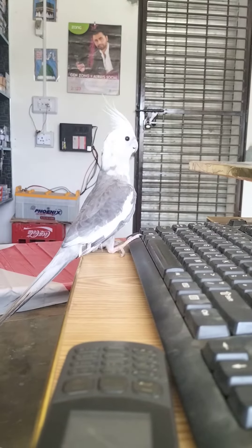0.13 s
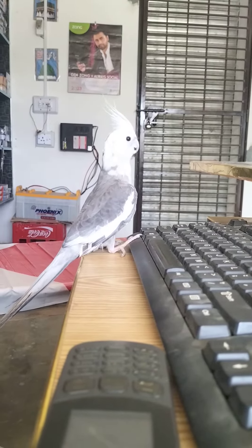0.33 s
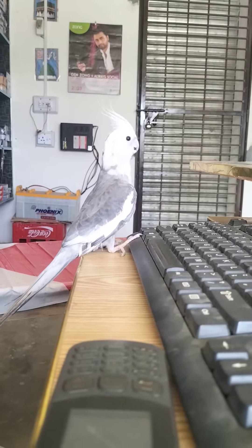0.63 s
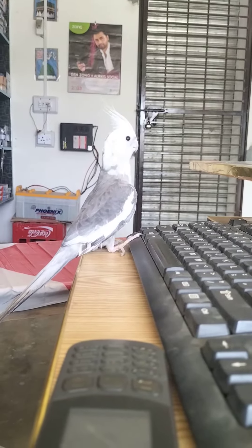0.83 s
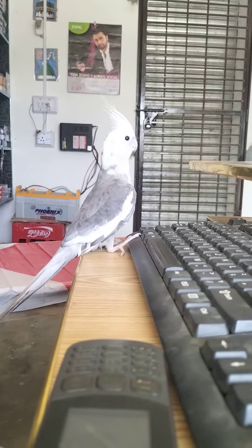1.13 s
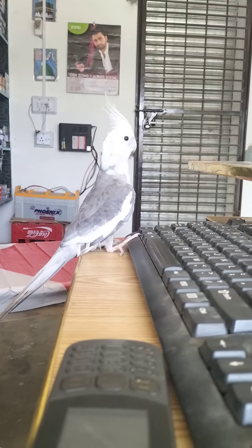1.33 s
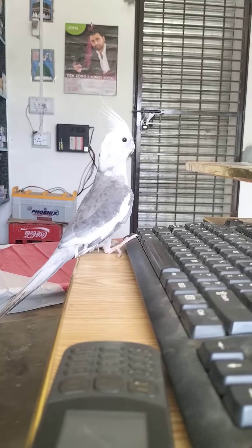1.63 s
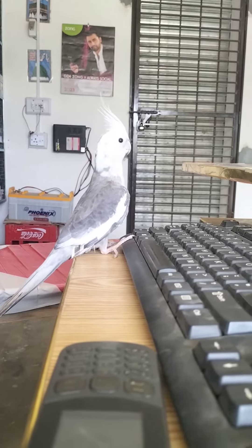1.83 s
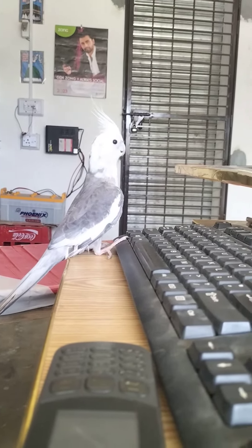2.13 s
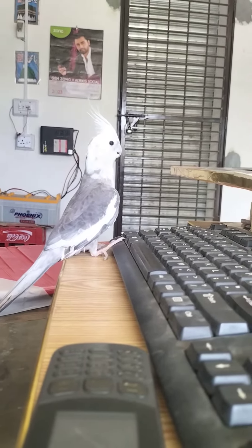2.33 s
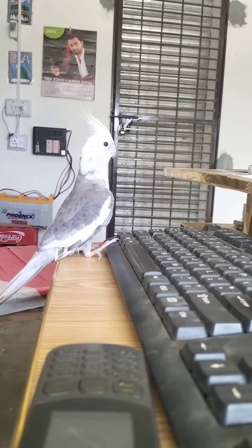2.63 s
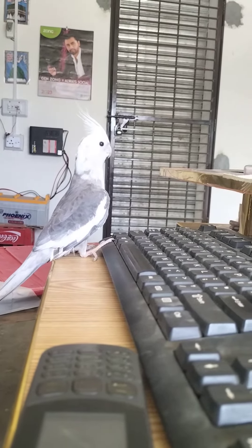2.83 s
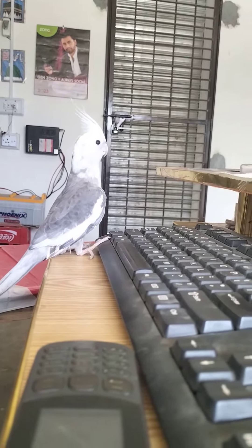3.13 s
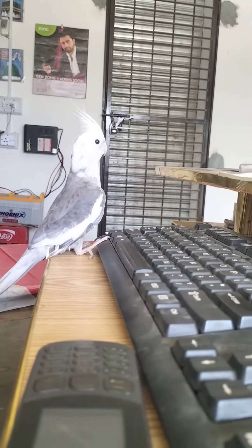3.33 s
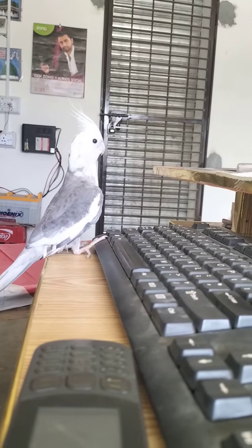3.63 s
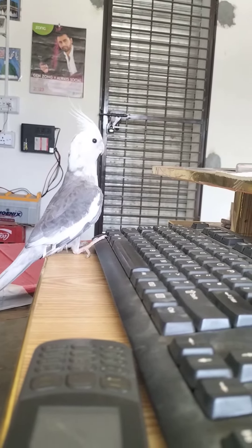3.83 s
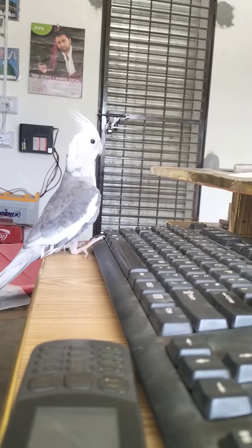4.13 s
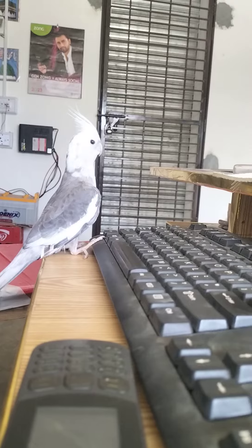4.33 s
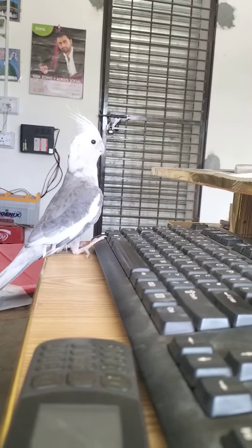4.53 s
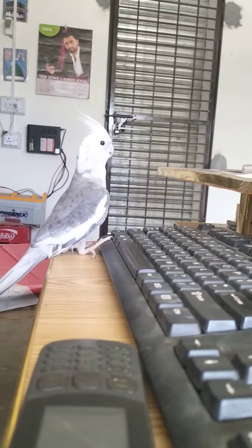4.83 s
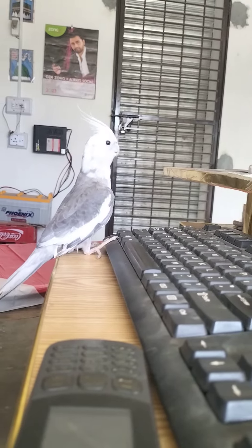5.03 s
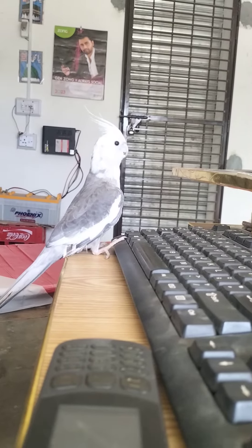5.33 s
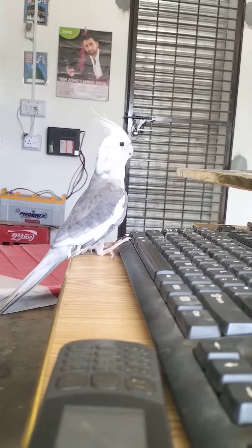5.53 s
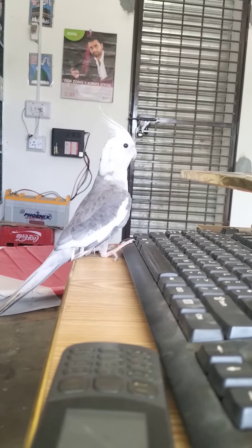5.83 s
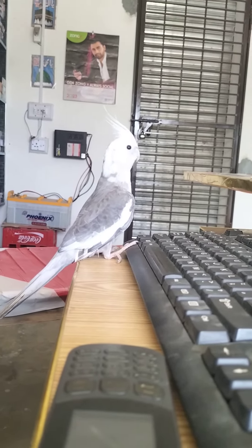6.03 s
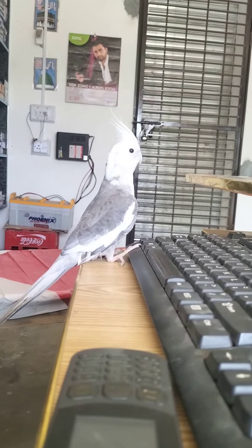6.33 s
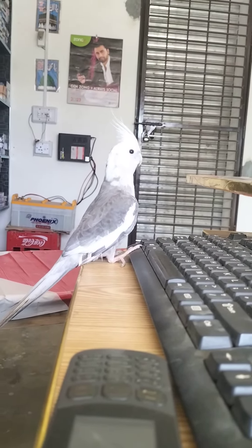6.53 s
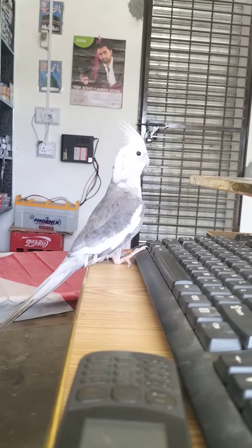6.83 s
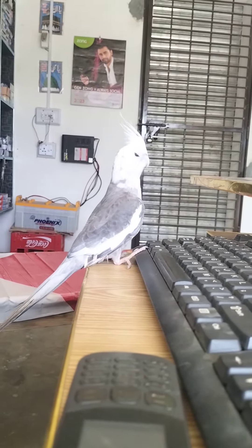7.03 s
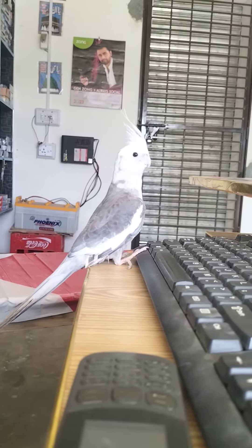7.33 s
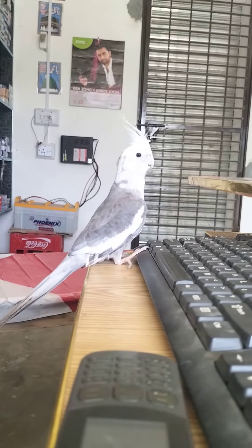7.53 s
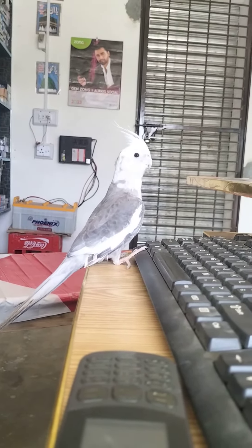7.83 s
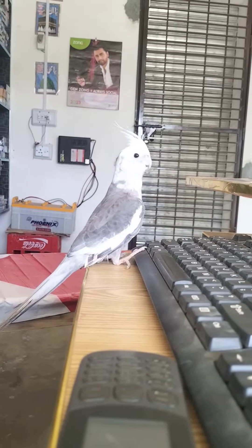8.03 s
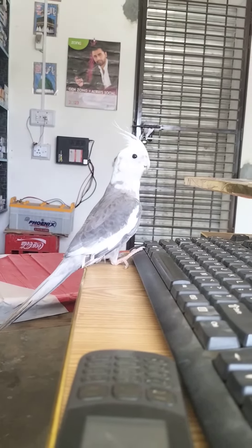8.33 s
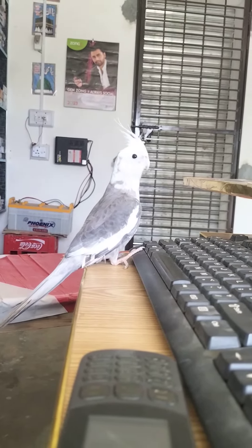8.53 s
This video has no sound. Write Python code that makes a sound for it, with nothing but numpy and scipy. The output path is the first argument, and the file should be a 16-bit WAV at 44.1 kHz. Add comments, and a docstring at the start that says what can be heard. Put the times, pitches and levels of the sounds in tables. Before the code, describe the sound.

Six sharp, nearly pure bird whistles burst out in a quiet room, separated by pauses, the last two closer together. Each jumps or climbs to a high held tone, sometimes roughening, and most drop into short lower swoops. Hard walls return a bright short ring. Far underneath are low rumble and hiss, a slow engine putter early on, a barely audible distant double caw midway, small clicks and dull thuds, all picked up by a nearby phone microphone.

```python
"""Cockatiel calling on a desk

Small, hard-walled room, phone microphone close by: a cockatiel gives six loud whistled calls.
Each opens with a reedy scoop and leap, or a hoarse climb, holds a clear tone near 3 kHz and breaks into
lower swoops: a near sine with overtones shaped by the throat, heard straight and off the walls.
Behind it: noise washes of air and traffic, sine hums and chirps, an engine's pulses, a far crow, clicks, bumps."""
import sys
import numpy as np
from scipy import signal
from scipy.fft import rfft, irfft, next_fast_len
from scipy.io import wavfile
from scipy.ndimage import uniform_filter1d, minimum_filter1d, map_coordinates

SR = 44100
rng = np.random.default_rng(int(sys.argv[2]) if len(sys.argv) > 2 else 0)


def wav_record(signal):
    """Record a signal, one row per channel, as 16-bit PCM in the file named by sys.argv[1]."""
    frames = np.transpose(np.atleast_2d(signal))
    bounded = np.clip(frames, -1, 1)
    # unit amplitude maps onto the largest positive 16-bit level
    quanta = np.round(bounded * 32767).astype(np.int16)
    wavfile.write(sys.argv[1], SR, quanta)


N = 382788  # length in samples

# Distant wash and hiss: start_s, wash_level_db, hiss_level_db
BACKGROUND_LEVELS = [(0, -58, -64.5), (1.2, -59.5, -69), (3.6, -60.5, -70.5), (4.4, -66.5, -79.5),
                     (5.6, -60, -76), (6.3, -65.5, -81), (7.1, -66, -80), (8.68, -61.5, -65)]
# Colours of the low rumble, mid air and hiss: freq_hz, relative_density_db
RUMBLE_COLOUR = [(20, -24), (45, -10.5), (75, -5), (150, 0.5), (210, -3.5), (320, 3.5), (450, -5.5),
                 (800, -39.5), (2000, -120)]
AIR_COLOUR = [(200, -28), (450, -1.5), (750, -0.5), (1300, -6.5), (2000, -17.5), (3000, -36), (6000, -120)]
HISS_COLOUR = [(100, -61.5), (1200, -19.5), (2400, 1.5), (4000, 3), (4600, -4.5), (5900, -0.5), (7000, -10),
               (8200, -30.5), (10000, -37.5), (11800, -32.5), (13000, -40), (15500, -38)]
AIR_DB = -0.9  # mid air over the low rumble
# Faint hums that come and go: pitch_hz, level_db, start_s, end_s
HUMS = [(97, -57.5, -1, .1), (158, -60.5, -1, 3.35), (73, -74.5, 0, 2.8), (71, -69, 3.5, 6.35)]
# Idling engine far outside, fading away: start_s, level_db
ENGINE_LEVELS = [(0, -59), (3, -64.5), (4.6, -77.5), (8.68, -84.5)]
# Resonances of its exhaust: freq_hz, width_hz, relative_level_db
EXHAUST_MODES = [(99, 30, -6), (154, 29, 2)]
# Resonances of the far crow's throat: freq_hz, width_hz, relative_level_db
CROW_THROAT = [(1407, 84, 1.5), (1758, 197, 2.5), (2267, 210, -11)]
# Far crow's caws: start_s, length_s, level_before_mix_db
CAWS = [(3.978, .04, -54), (4.084, .05, -54)]
CAW_FADE_S = 0.058
# Faint far tones and chirps: start_s, length_s, start_hz, end_hz, level_before_mix_db, quaver_share_of_pitch
CHIRPS = [(.023, 0.057, 254, 231, -48.5, .02), (.197, 0.099, 238, 264, -49.5, 0.023),
          (.235, .07, 750, 798, -56, .02), (.564, 0.066, 779, 750, -50, 0.021),
          (1.142, 0.087, 262, 236, -51, 0.018), (1.668, 0.099, 3850, 3790, -61.5, 0.075),
          (1.838, 0.063, 570, 589, -61.5, 0.027), (1.93, 0.0595, 2087, 2000, -68.5, .04),
          (3.188, 0.068, 1400, 1376, -62.5, .02), (7.096, 0.081, 3590, 3560, -61, 0.014),
          (7.12, 0.073, 2410, 2336, -65.5, .05), (7.329, 0.044, 3120, 3300, -56, .025),
          (8.56, 0.13, 289.5, 284, -58.5, .02)]
# Soft bumps through the desk: start_s, level_db
BUMPS = [(5.48, -55), (5.7, -53.5), (7.37, -55), (7.6, -53)]
# Tiny dry clicks, one alone and one at the onset of the fourth call: start_s, level_db
TICKS = [(3.819, -50.5), (5.377, -46.5)]

# What throat and beak pass of the overtones: freq_hz, gain_db
OVERTONE_THROAT = [(2800, -8.5), (3700, -16), (4230, -4.5), (4500, -15), (4850, -14), (5300, -21.5),
                   (6000, -18.5), (6700, -22.5), (7300, -33), (8200, -49), (9800, -56), (11000, -40),
                   (12000, -42.5), (13200, -46.5), (15500, -50.5)]
# What throat and beak pass of the fundamental: freq_hz, gain_db
FUNDAMENTAL_THROAT = [(1400, -20), (1850, -14.5), (2100, -10.5), (2400, -3), (2650, 0), (3170, -2),
                      (3350, -10.5), (3800, -10)]
# Colour of the rasp around the whistle's lines: freq_hz, relative_density_db
RASP_COLOUR = [(600, -88.5), (1300, -45), (2100, 0), (2800, -4), (3700, -2), (4500, -11), (5500, -6.5),
               (6600, -13.5), (8400, -35.5), (10000, -43.5), (11800, -33), (15500, -44.5)]
# Calls opening with a reedy scoop and a yodelling leap: start_s, scoop_length_s, scoop_lowest_hz,
# scoop_final_effort_db, leap_top_hz, leap_dip_hz, leap_effort_db, leap_roughness_0_to_1
YODELS = [(.123, .077, 1385, -14, 2620, 1919, -13, 0), (2.148, .048, 1545, -9, 2974, 2655, -9.5, 0.2),
          (4.594, .066, 1450, -14, 2900, 2513, -15, .06), (7.372, .062, 1445, -12.5, 3350, 2520, -19, 0.4)]
# Scoop: share of its length spent falling; first and last pitch over the lowest
SCOOP_FALL, SCOOP_FROM, SCOOP_TO = .43, 1.1, 1.32
SCOOP_SWELL_DB, SCOOP_BRIGHT_DB, SCOOP_ROUGH = 8.5, -13.5, .05
# Leap: the pitch it starts from after the flip; the shares of its length at which it tops and dips
LEAP_HZ, LEAP_TOP, LEAP_DIP, LEAP_BRIGHT_DB = 2498, .27, .67, -8
LEAP_ONSET_DB = -3  # the voice lands a little softly after the flip
# Calls opening with a hoarse two-step climb: start_s, effort_db
CLIMBS = [(5.385, -9.5), (8.068, -10)]
# The climb they share: length_share, pitch_over_whistle, added_effort_db, brightness_db, roughness_0_to_1
CLIMB_SHAPE = [(0, .576, -12, -9, .85), (.09, .576, -4.5, -13, 0.76), (.14, .605, 1.5, -7, .12),
               (.28, .773, 0, -3.5, .06), (.53, .759, -4.5, -2, .05), (.63, .853, 2.5, 3, .05),
               (.77, .986, -3.5, -1, 0.25), (.87, 1.16, -5.5, -12, .5), (.95, 1.12, 4.5, -14.5, .45)]
# Held whistle of each call, from the end of its opening: time_s, pitch_hz, effort_db, roughness_0_to_1
WHISTLES = [
    [(.27, 2887, -12, 0), (.32, 2830, -11, 0.1), (.342, 3063, -6.5, 0), (.4, 2994, -11.5, .07),
     (.425, 2830, -17, 0.48), (.45, 2987, -15.5, 0.5), (.49, 3246, -16.5, .35), (.511, 3030, -14.5, .3)],
    [(2.28, 2935, -8.5, .05), (2.355, 2934, -13, .05), (2.365, 3025, -11.5, .05), (2.44, 3000, -14.5, .04),
     (2.508, 2986, -9.5, .04)],
    [(4.745, 2965, -11.5, 0), (4.79, 2979, -9.5, 0.01), (4.842, 2931, -14, 0.05), (4.88, 3200, -22.5, .3),
     (4.903, 2990, -25, .8), (4.915, 3000, -18.5, .1), (4.942, 2790, -17.5, .2), (4.955, 2151, -17.5, .3),
     (4.974, 2873, -18.5, .1), (5.008, 3072, -11, .05)],
    [(5.546, 3130, -6.5, 0.14), (5.57, 3143, -7.5, .05), (5.598, 3042, -3.5, .05)],
    [(7.505, 2790, -13, .07), (7.53, 2859, -17.5, .05), (7.585, 2895, -15, .06), (7.595, 3019, -19.5, .08),
     (7.63, 2967, -22, .12), (7.67, 2904, -19.5, .1), (7.726, 2879, -20.5, 0.1)],
    [(8.254, 3160, -7.5, .04), (8.31, 3130, -13.5, .05), (8.349, 3050, -10.5, .05),
     (8.401, 2960, -14.5, .05)],
]
# The whistle gets purer as it gets louder: dB of overtones lost per dB of effort
WHISTLE_BRIGHT_DB, PURITY = -13.5, 0.67
# Lower notes a whistle breaks into: start_s, fall_s, rise_s, first_hz, turning_hz, last_hz,
# mid_effort_db, brightness_db, roughness_0_to_1
CLOSINGS = [(.517, .015, .055, 2280, 2205, 2688, -14, -6.5, .06),
            (0.596, .04, .024, 2467, 2099, 2641, -13.5, 11, 0),
            (2.512, .018, .022, 2646, 2556, 2707, -7.5, -6, .04),
            (5.034, .012, .012, 2387, 2405, 2377, -13.5, 1, 0.07),
            (5.601, .029, 0.026, 2321, 2234, 3080, -9.5, -2.5, 0.5),
            (7.732, .02, .037, 2302, 2166, 2543, -13, -10, 0),
            (8.404, .032, .002, 2680, 2291, 2164, -10, -4, .08)]
CLOSING_SWELL_DB = 4.5
BEND = 1.6  # power of time with which a swoop leaves its turning pitch
# In glides this fast the voice loses overtones and turns rough
GLIDE_OCT_PER_S, GLIDE_DULL_DB, GLIDE_ROUGH = 13, 6.5, 0.12

# The room's ring: freq_hz, t60_s
ROOM_RING = [(1500, 0.56), (3000, 0.48), (6000, .44), (12000, .35)]
# The beak points away, so the overtones reach the microphone mostly off the walls.
# Straight path and wall path: freq_hz, gain_db
DIRECT_PATH = [(1500, -3.5), (3200, 0.5), (4500, -3.5), (6000, -5.5), (12000, -3)]
REFLECTED_PATH = [(1500, -7), (3200, -7.5), (4500, -5), (6000, -0.5), (12000, -2)]
TOP_HZ = 15550  # band limit of the phone


def amp(db):
    """Amplitude factor of a level in dB."""
    return 10 ** (np.asarray(db) / 20)


def unit(x):
    """x scaled to rms 1."""
    return x / np.sqrt(np.mean(x ** 2) + 1e-20)


def along(table, hz):
    """Values of a (Hz, value) table, read on a log frequency axis."""
    f, v = np.transpose(table)
    return np.interp(np.log(hz + 1), np.log(f), v)


def curves(rows, t):
    """Each column after the time, read at the times t."""
    s, *cols = np.transpose(rows)
    return [np.interp(t, np.sort(s), c) for c in cols]


def wobble(rate, size):
    """A smooth random curve, rate knots a second."""
    knots = rng.standard_normal(int(size * rate / SR) + 4)
    return map_coordinates(knots, [np.arange(size) * rate / SR])


def filtered(x, response):
    """x times a response of frequency."""
    m = next_fast_len(N + SR // 2)
    return irfft(rfft(x, m) * response(np.fft.rfftfreq(m, 1 / SR)), m)[:N]


def noise(colour):
    """Noise of rms 1 with the given colour."""
    return unit(filtered(rng.standard_normal(N), lambda hz: amp(along(colour, hz))))


def gate(t, start, end, fade):
    """1 between start and end, with soft edges just outside."""
    inside = np.minimum(t - start, end - t)
    return np.sin(np.pi / 2 * np.clip(inside / fade + 1, 0, 1)) ** 2


def background(t):
    """Distant rumble, air and hiss: coloured noises whose levels drift slowly."""
    wash_db, hiss_db = curves(BACKGROUND_LEVELS, t)
    rumble = amp(wash_db + .8 * wobble(8.4, N)) * noise(RUMBLE_COLOUR)
    air = amp(wash_db + AIR_DB) * noise(AIR_COLOUR)
    hiss = amp(hiss_db + .7 * wobble(7, N)) * noise(HISS_COLOUR)
    return rumble + air + hiss


def hums(t):
    """Faint low sines, unsteady in level and phase."""
    out = np.zeros(N)
    for hz, db, start, end in HUMS:
        level = amp(db + 1.5 * wobble(7, N)) * gate(t, start, end, 0.65)
        out += level * np.sin(2 * np.pi * hz * t + .9 * wobble(9, N))
    return out


def exhaust(f):
    """Complex response of the exhaust's resonances, alternating in sign."""
    response = 0
    for k, (hz, width, db) in enumerate(EXHAUST_MODES):
        response = response + (-1) ** k * amp(db) * 1j * f * width / (hz * hz - f * f + 1j * f * width)
    return response


def engine(t, scatter_db=1.15):
    """Far outside, each firing of a slow single cylinder rings the exhaust."""
    firing_hz = 14.2 * (1 + .015 * wobble(3, N))
    turns = np.floor(np.cumsum(firing_hz) / SR)
    firings = np.diff(turns, prepend=0) * amp(scatter_db * wobble(33, N))
    muffled = filtered(firings, lambda f: exhaust(f) / (1 + (f / 300) ** 4))
    return amp(curves(ENGINE_LEVELS, t)[0]) * unit(muffled)


def crow(t):
    """A far crow's hoarse double caw: noise through the throat's resonances."""
    def throat(f):
        return sum(amp(db) / (1 + (2 * (f - hz) / width) ** 2) for hz, width, db in CROW_THROAT)

    caws = sum(amp(db) * gate(t, s, s + length, CAW_FADE_S) for s, length, db in CAWS)
    return caws * unit(filtered(rng.standard_normal(N), throat))


def chirps(t):
    """Faint tones from outside: short gliding sines with a quavering pitch."""
    out = np.zeros(N)
    unsteady = wobble(500, N)
    for s, length, start_hz, end_hz, db, quaver in CHIRPS:
        pitch = np.interp(t, [s, s + length], [start_hz, end_hz]) * (1 + quaver * unsteady)
        out += amp(db) * gate(t, s, s + length, .02) * np.sin(2 * np.pi * np.cumsum(pitch) / SR)
    return out


def bumps(t, desk_hz=55, t60=0.17):
    """Dull, quickly damped thuds in the desk top."""
    ages = [(np.maximum(t - s, 0), db) for s, db in BUMPS]
    return sum(amp(db - 60 * age / t60) * np.sin(2 * np.pi * desk_hz * age) for age, db in ages)


def ticks(t, t60=0.0104):
    """Tiny dry clicks, one alone and one at the onset of the fourth call: coloured noise that dies quickly."""
    strength = sum(amp(db - 60 * np.abs(t - s) / t60) * (t >= s) for s, db in TICKS)
    colour = [(1500, -21), (2700, 1.0), (4500, -8.0), (7000, -2.5), (8500, -33.0), (14000, -49.5)]
    return strength * noise(colour)


def swoop(start, fall, rise, first, turn, last, count=6):
    """Times and pitches of a rounded dip or arch: to the turning pitch and away again."""
    u = np.arange(-count, count + 1) / count
    s = start + fall + u * np.where(u < 0, fall, rise)
    pitch = turn + (np.where(u < 0, first, last) - turn) * np.abs(u) ** BEND
    return s, pitch


def points(*columns):
    """Rows of (s, pitch Hz, effort dB, brightness dB, roughness) from columns or constants."""
    return np.column_stack(np.broadcast_arrays(*columns))


def yodel(row, end, landing):
    """A low scoop swells until the voice flips up, overshoots and dips on its way to the whistle."""
    start, length, lowest, scoop_db, top, dip, leap_db, rough = row
    fall, rise = SCOOP_FALL * length, (1 - SCOOP_FALL) * length
    s, pitch = swoop(start, fall, rise, SCOOP_FROM * lowest, lowest, SCOOP_TO * lowest)
    swell_db = np.linspace(-SCOOP_SWELL_DB, 0, len(s))
    scoop = points(s, pitch, scoop_db + swell_db, SCOOP_BRIGHT_DB, SCOOP_ROUGH)

    flip = s[-1] + .003
    span, between = end - flip, (LEAP_DIP - LEAP_TOP) / 2
    middle = (top + dip) / 2
    arch = swoop(flip, LEAP_TOP * span, between * span, LEAP_HZ, top, middle)
    sag = swoop(arch[0][-1], between * span, (1 - LEAP_DIP) * span, middle, dip, landing)
    s, pitch = np.hstack([arch, sag])[:, :-2]  # the whistle itself takes over at the landing
    effort_db = leap_db + np.interp(s, [flip, flip + LEAP_TOP * span], [LEAP_ONSET_DB, 0])
    return np.vstack([scoop, points(s, pitch, effort_db, LEAP_BRIGHT_DB, rough)])


def climb(row, end, landing):
    """The hoarse two-step climb, stretched to reach the whistle."""
    start, effort_db = row
    share, pitch, push_db, bright_db, rough = np.transpose(CLIMB_SHAPE)
    return points(start + (end - start) * share, landing * pitch, effort_db + push_db, bright_db, rough)


def closing(row):
    """A short swelling swoop below the whistle."""
    *shape, effort_db, bright_db, rough = row
    s, pitch = swoop(*shape)
    swell_db = CLOSING_SWELL_DB * np.linspace(-.5, .5, len(s))
    return points(s, pitch, effort_db + swell_db, bright_db, rough)


def calls():
    """Each call is an opening, a held whistle and the closing notes that follow it."""
    openings = [(row, yodel) for row in YODELS] + [(row, climb) for row in CLIMBS]
    openings.sort(key=lambda pair: pair[0][0])
    out = []
    for (row, opening), held in zip(openings, WHISTLES):
        s, pitch, effort_db, rough = np.transpose(held)
        start = opening(row, s[0], pitch[0])
        middle = points(s, pitch, effort_db, WHISTLE_BRIGHT_DB - PURITY * effort_db, rough)
        ends = [closing(note) for note in CLOSINGS if abs(note[0] - s[-1]) < .25]
        out.append(np.vstack([start, middle, *ends]))
    return out


def whistle(call, waver=.002, jitter=.03, shimmer_db=4, split_db=-10, rolloff_db=-3, pressing=0.069,
            flutter_db=2, attack=.003, release=.011):
    """One call: the syrinx membrane sings a near sine whose overtones pass the throat."""
    start, end = call[0][0], call[-1][0]
    n = np.arange(int((start - .03) * SR), int((end + .03) * SR))
    t, size = n / SR, len(n)
    pitch, effort_db, bright_db, rough = curves(call, t)
    level_db = effort_db + along(FUNDAMENTAL_THROAT, pitch)
    overtone_db = effort_db + bright_db

    octaves_per_s = uniform_filter1d(np.abs(np.gradient(np.log2(pitch))) * SR, size=200)
    gliding = np.tanh((octaves_per_s / GLIDE_OCT_PER_S) ** 2)
    overtone_db = overtone_db - GLIDE_DULL_DB * gliding
    rough = np.clip(rough + GLIDE_ROUGH * gliding, 0, 1)
    # loudness cannot change at once
    level_db, overtone_db = uniform_filter1d([level_db, overtone_db], size=130)

    # where the membrane turns unstable, pitch and strength scatter from cycle to cycle
    pitch = pitch * (1 + waver * wobble(260, size) + jitter * rough * wobble(1100, size))
    phase = 2 * np.pi * np.cumsum(pitch) / SR
    tone = amp(level_db) * np.sin(phase)
    # the harder the bird presses, the more slowly the overtones fall off
    slope_db = rolloff_db + pressing * np.maximum(overtone_db + 16, 0)
    for k in range(2, 11):
        partial_db = overtone_db + along(OVERTONE_THROAT, k * pitch) + slope_db * (k - 2)
        tone += amp(partial_db + flutter_db * wobble(400, size)) * np.sin(k * phase)

    # in the roughest moments the period doubles: a line halfway to the second harmonic
    doubling = np.clip(2 * rough - 1, 0, 1)
    tone += amp(level_db + split_db) * doubling * np.sin(3 * phase / 2)

    edges = gate(t, start, np.inf, attack) * gate(t, 0, end - release / 2, release)
    shimmer = amp(shimmer_db * rough * wobble(700, size))
    out = np.zeros(N)
    out[n] = np.sqrt(2) * tone * shimmer * edges
    return out


def cockatiel(rasp_db=-40):
    """Six calls; turbulence in the syrinx spreads a faint noisy skirt around each line."""
    voice = sum(whistle(call) for call in calls())
    strength = np.sqrt(np.abs(uniform_filter1d(voice ** 2, size=256)))
    return voice + amp(rasp_db) * strength * noise(RASP_COLOUR)


def room(x, gap=.004, early_db=3, early_time=0.022):
    """Near walls answer first and strongest, then a dense tail, drawn afresh for each call."""
    starts = [0] + [int((call[0][0] - .03) * SR) for call in calls()[1:]] + [N]
    out = np.zeros(N + 2 * SR)
    for a, b in zip(starts, starts[1:]):
        hz, t, z = signal.stft(rng.standard_normal(SR * 3 // 4), SR, nperseg=256)
        decay_db = early_db * np.exp(-t / early_time) - 60 * t / along(ROOM_RING, hz)[:, None]
        tail = signal.istft(z * amp(decay_db), SR, nperseg=256)[1]
        tail = np.pad(tail / np.linalg.norm(tail), (int(gap * SR), 0))
        wet = signal.fftconvolve(x[a:b], tail)
        out[a:a + len(wet)] += wet
    return out[:N]


def scene():
    """The bird, straight and off the walls, over the faint sounds behind it."""
    t = np.arange(N) / SR
    bird = cockatiel()
    far = crow(t) + chirps(t)
    direct = filtered(bird, lambda hz: amp(along(DIRECT_PATH, hz)))
    reflected = filtered(room(bird), lambda hz: amp(along(REFLECTED_PATH, hz)))
    outside = amp(-0.5) * far + amp(-5.0) * room(far) + engine(t)
    behind = background(t) + hums(t) + bumps(t) + ticks(t)
    return (direct + reflected + outside + behind)[None]


def record(dry):
    """The phone's limiter holds the peaks down; nothing passes above its band limit."""
    ceiling = .8
    needed = np.minimum(1, ceiling / (np.abs(dry[0]) + 1e-9))
    gain = uniform_filter1d(minimum_filter1d(needed, size=300), size=300)
    return filtered(dry[0] * gain, lambda hz: hz < TOP_HZ)[None]


dry = scene()
out = record(dry)
wav_record(out)
```